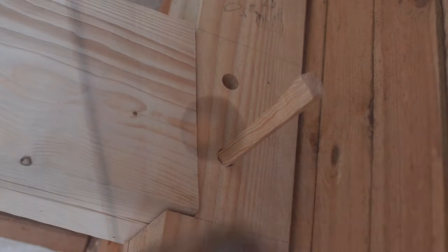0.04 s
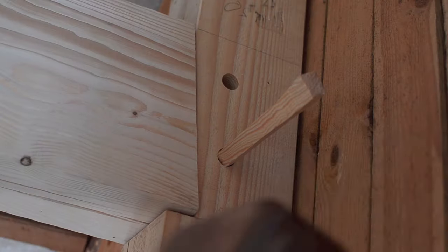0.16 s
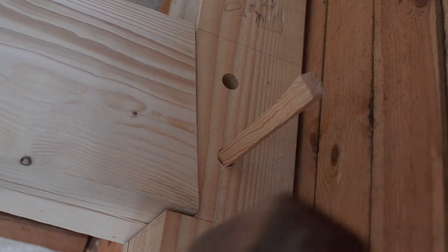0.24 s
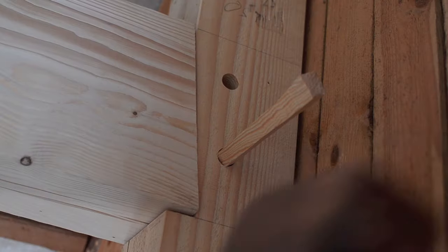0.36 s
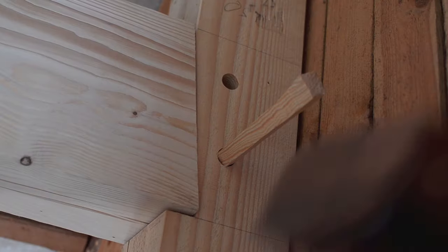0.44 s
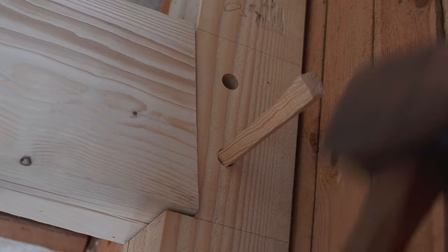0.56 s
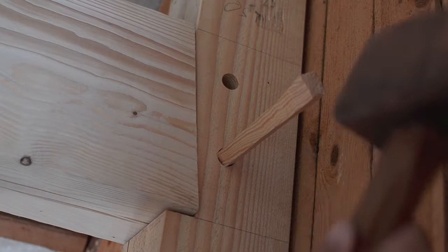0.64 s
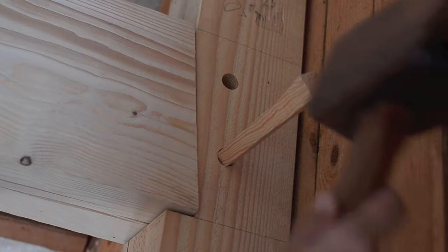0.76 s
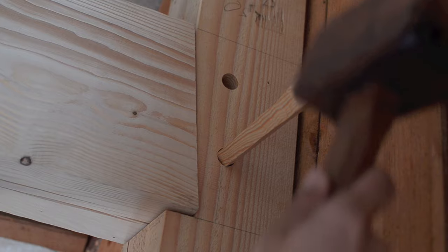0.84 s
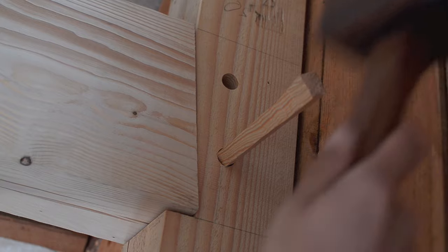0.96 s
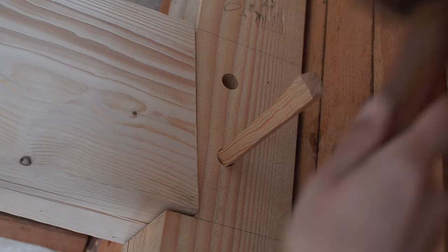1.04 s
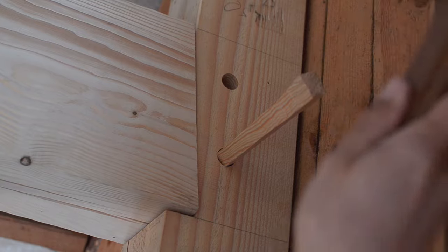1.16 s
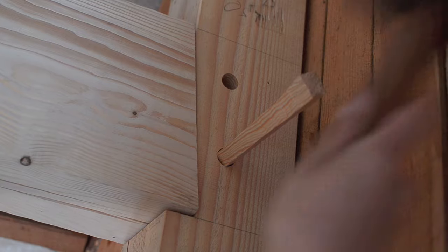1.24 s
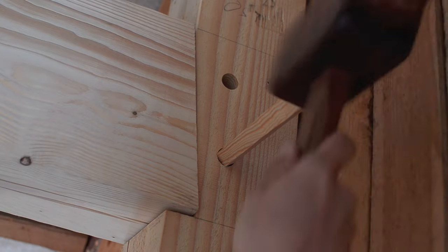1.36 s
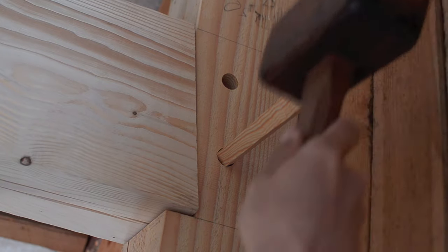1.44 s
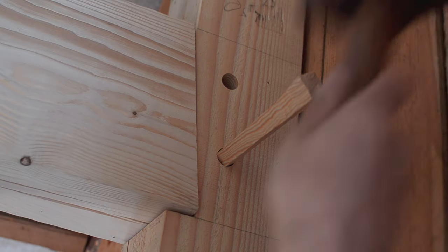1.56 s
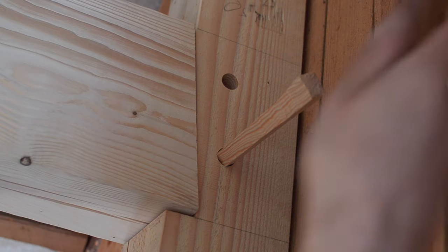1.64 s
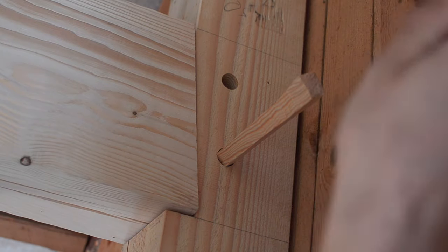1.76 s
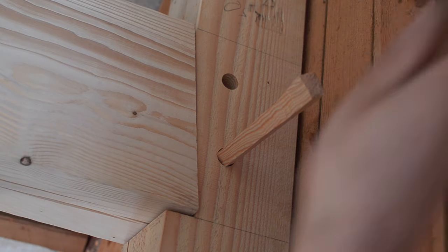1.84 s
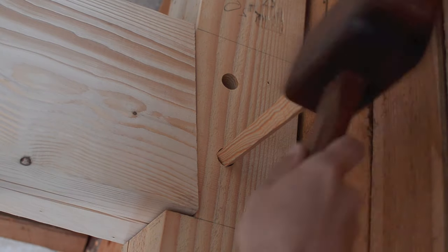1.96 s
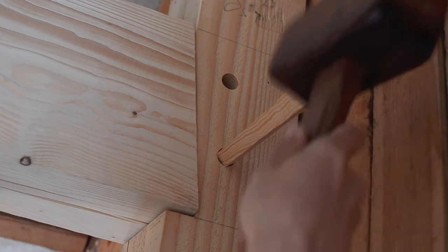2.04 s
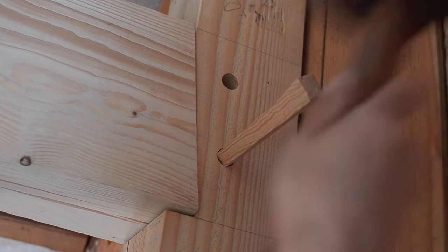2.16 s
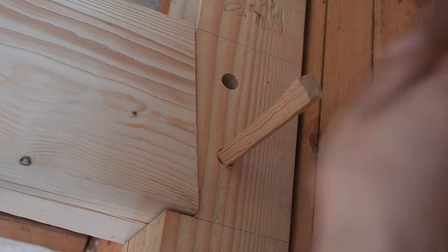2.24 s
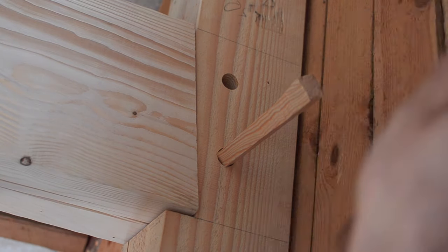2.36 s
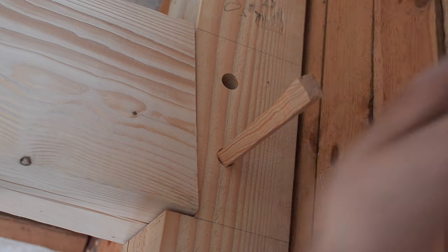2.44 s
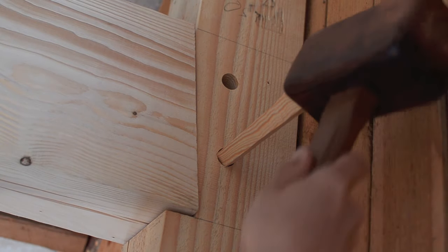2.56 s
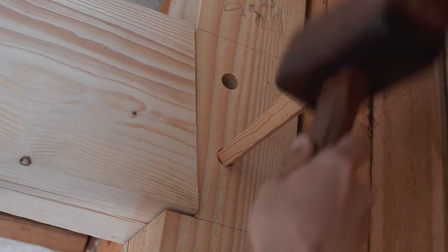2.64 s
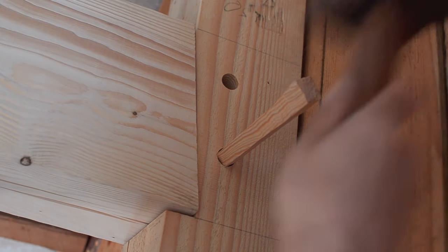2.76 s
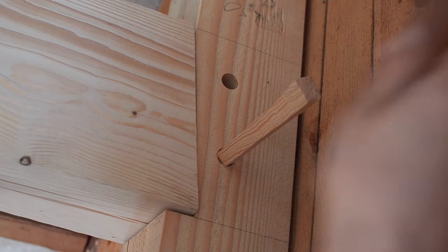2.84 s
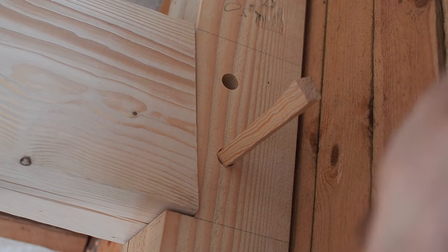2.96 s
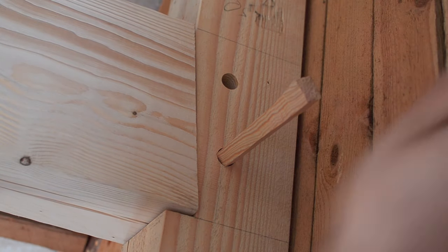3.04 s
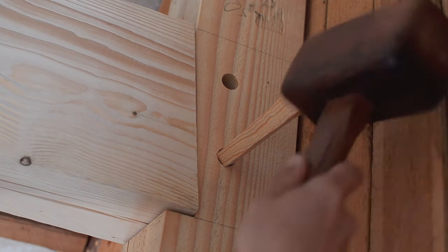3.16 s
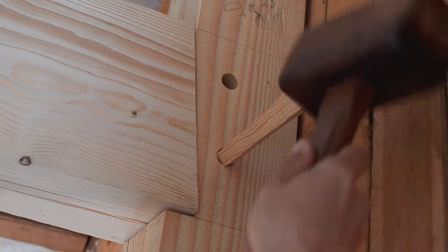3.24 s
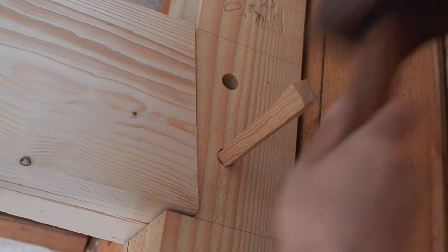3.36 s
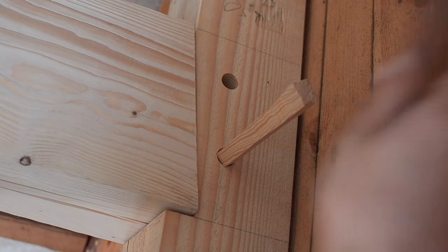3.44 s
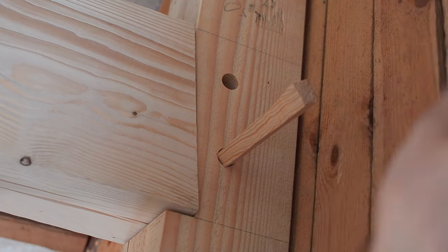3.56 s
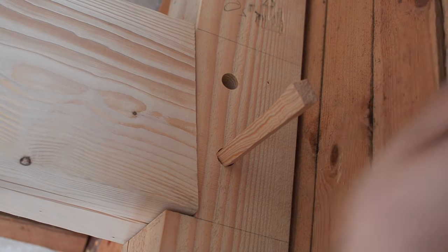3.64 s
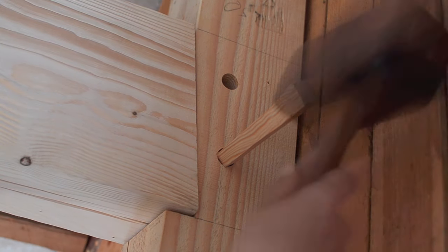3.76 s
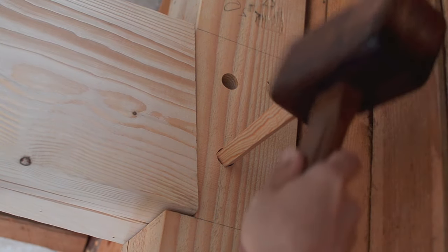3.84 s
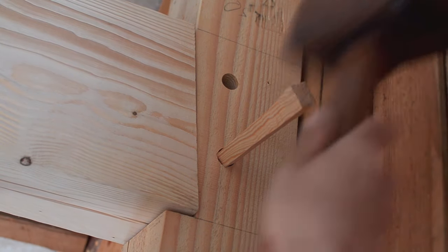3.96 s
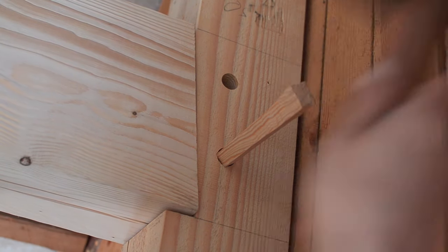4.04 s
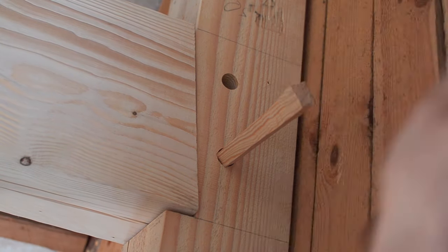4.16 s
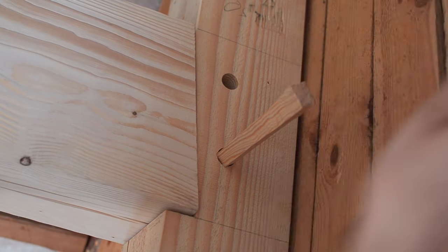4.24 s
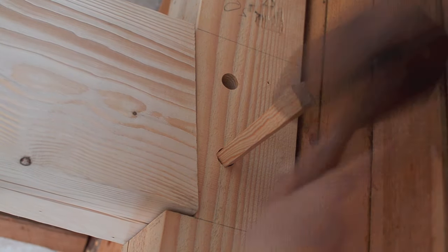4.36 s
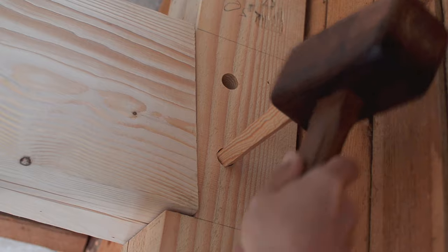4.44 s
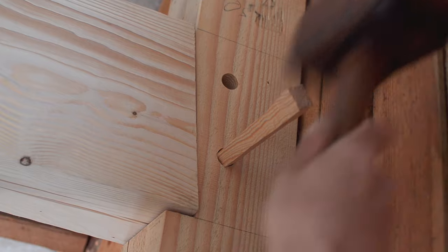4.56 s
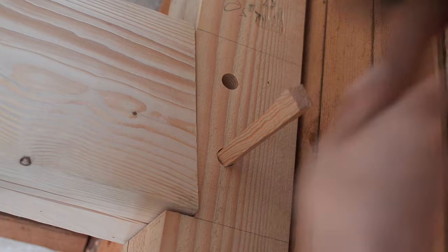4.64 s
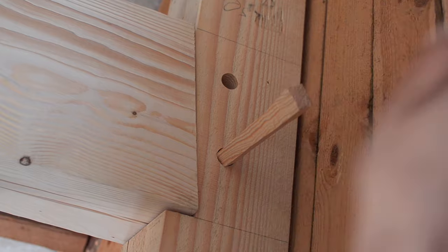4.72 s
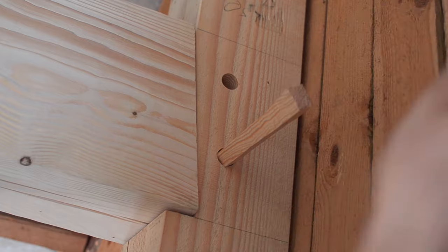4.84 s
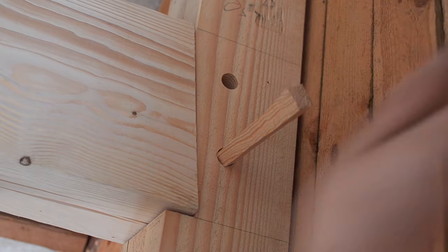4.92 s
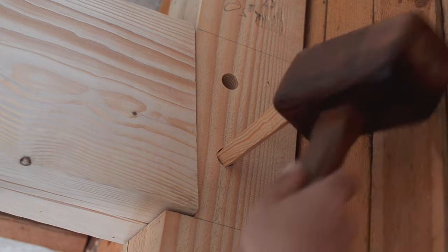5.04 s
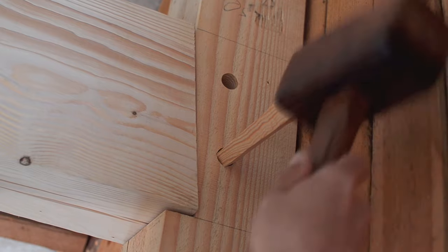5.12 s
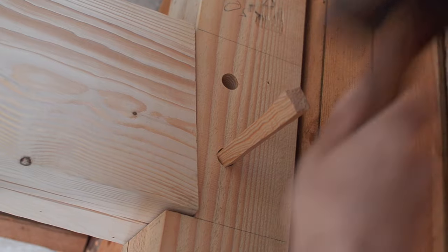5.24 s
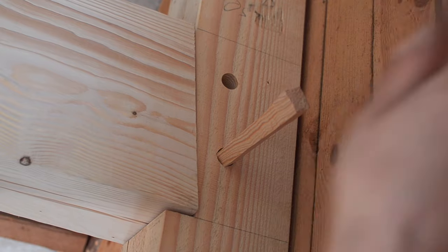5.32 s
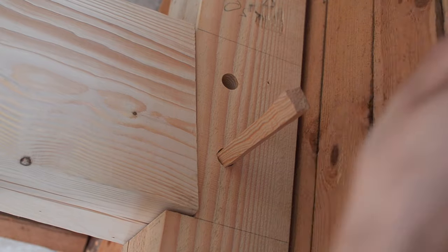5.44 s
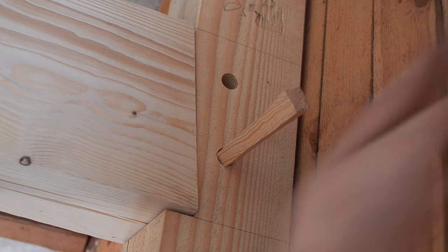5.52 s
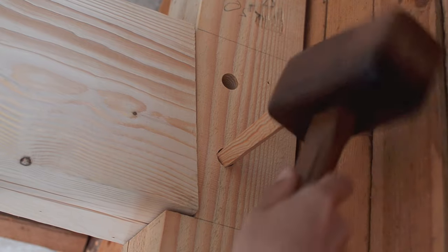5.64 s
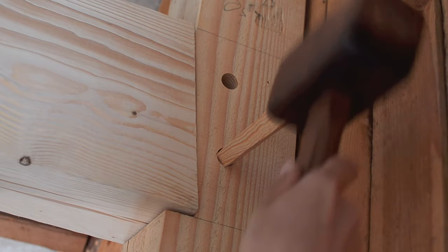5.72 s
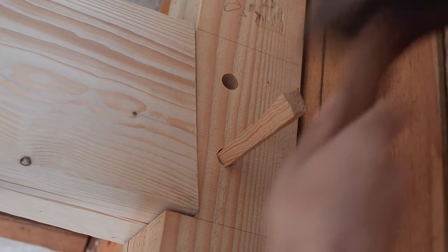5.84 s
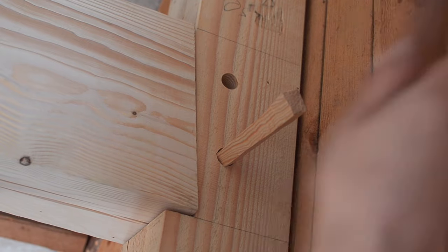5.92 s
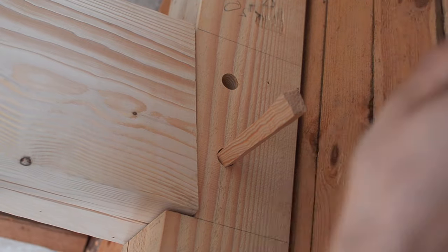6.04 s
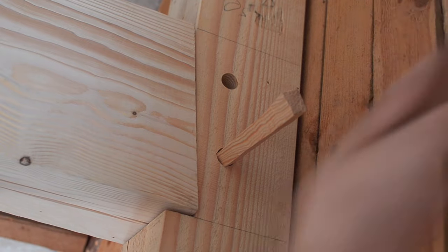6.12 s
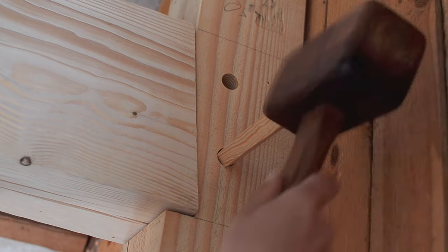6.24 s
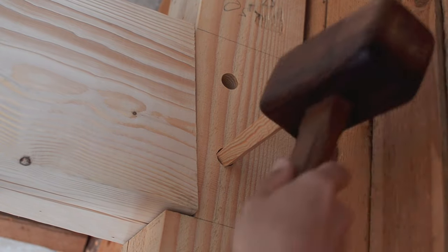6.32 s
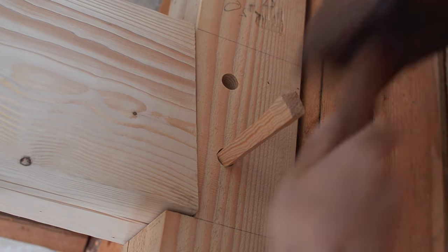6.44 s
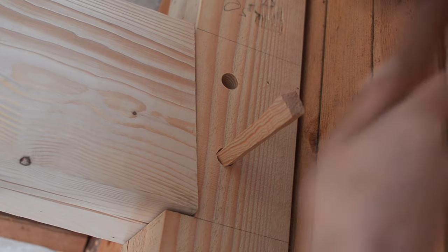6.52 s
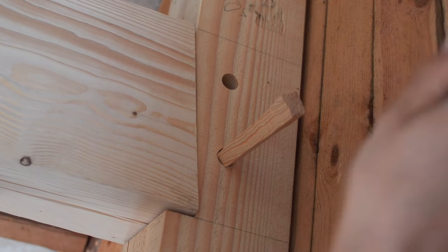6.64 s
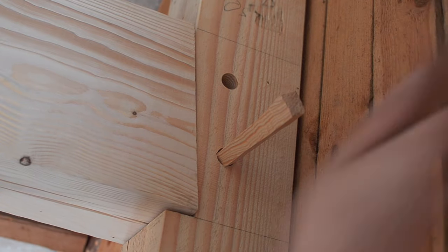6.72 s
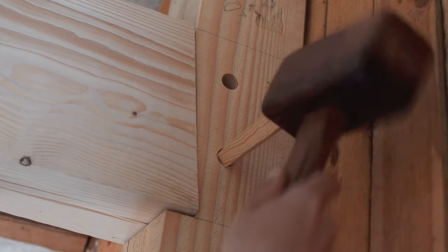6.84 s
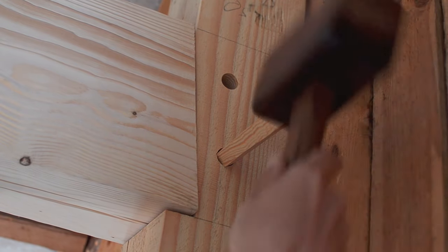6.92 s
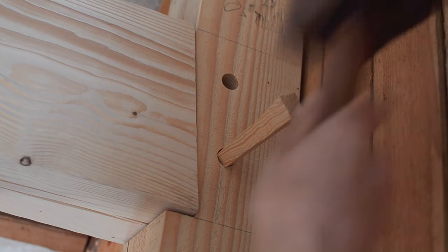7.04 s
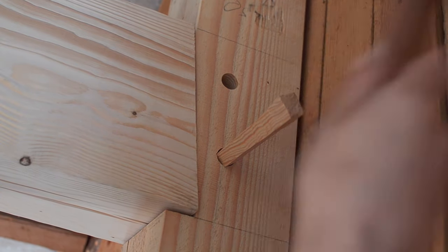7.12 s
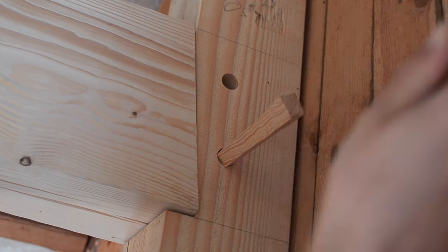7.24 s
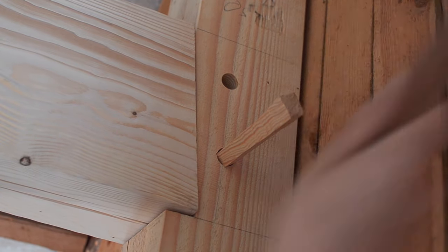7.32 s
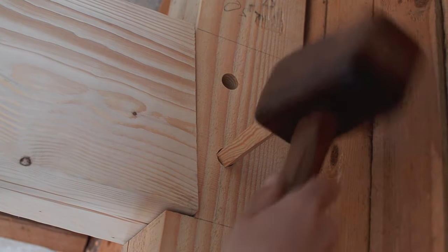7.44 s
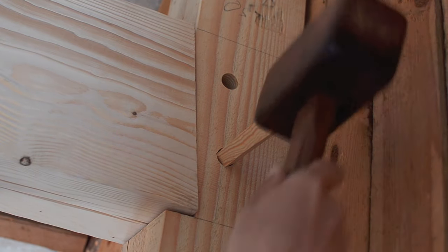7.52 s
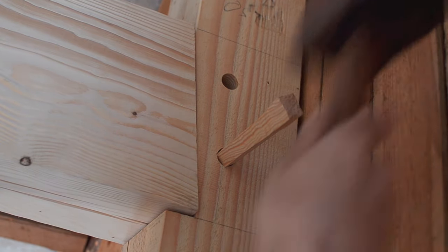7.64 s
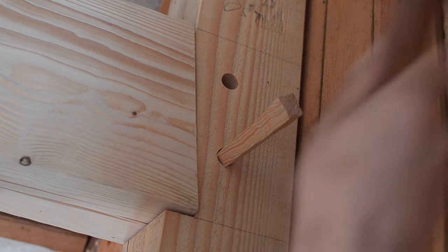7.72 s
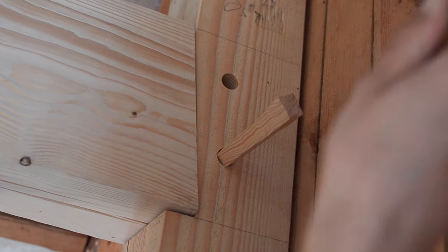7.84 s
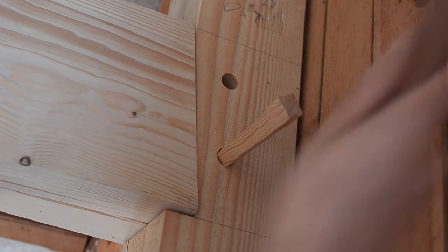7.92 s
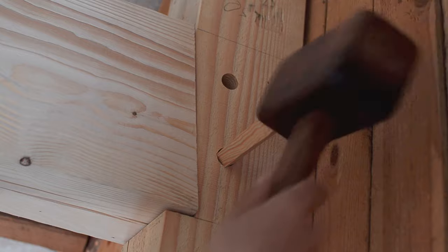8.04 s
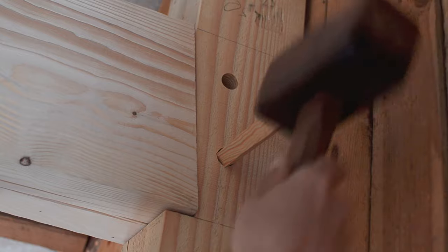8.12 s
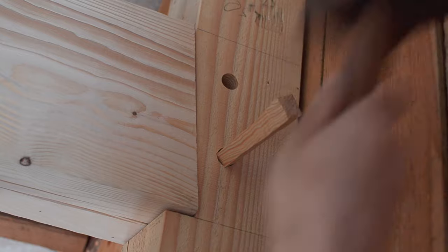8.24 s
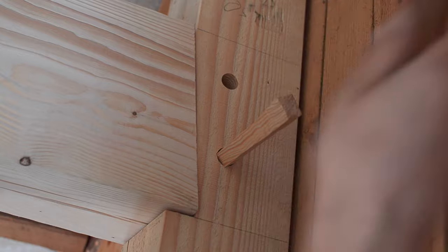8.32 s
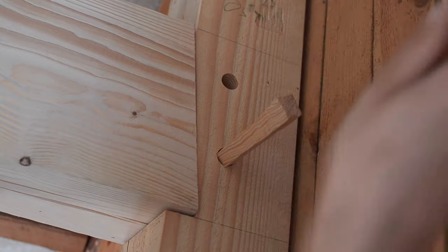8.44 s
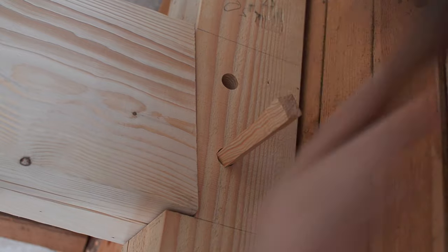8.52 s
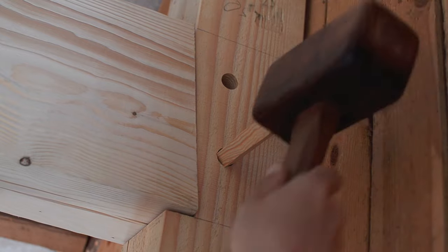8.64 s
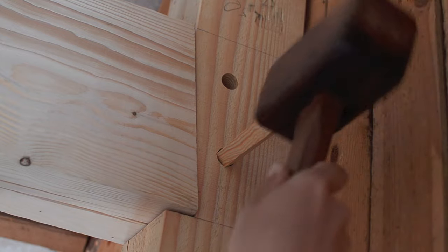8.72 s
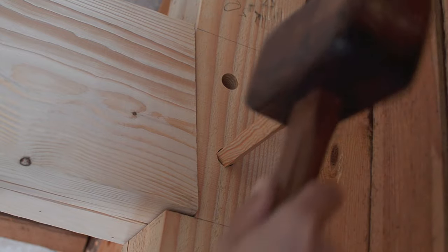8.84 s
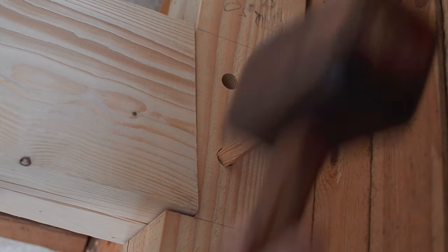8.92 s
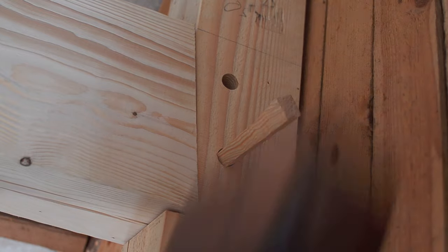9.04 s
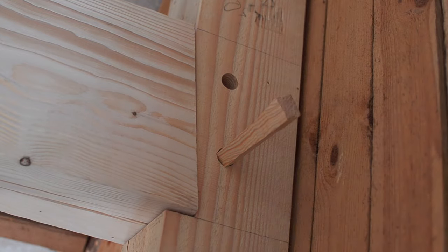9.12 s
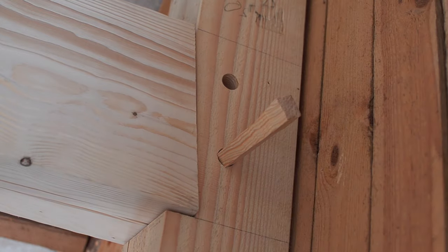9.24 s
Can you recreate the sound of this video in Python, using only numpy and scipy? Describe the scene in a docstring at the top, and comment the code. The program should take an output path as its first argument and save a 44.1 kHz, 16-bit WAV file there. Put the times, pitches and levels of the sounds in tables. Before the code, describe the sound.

After a quiet opening, evenly spaced close mallet blows crack on a wooden peg, booming through timber, their tone growing tighter and harder.

```python
"""Mallet and peg

Faint air, low rumble, soft rustles and later small high ticks, all filtered noise; a heavy mallet drives
a wooden peg into a timber frame, thirteen blows, close up. Each blow is a crack, a contact and short peg
modes, with slow waves through the building and a dense noise tail for the bare room, all coloured by its
push. The tone hardens as the peg seats, and loud peaks overload the recorder."""
import sys
import numpy as np
from scipy import signal
from scipy.fft import rfft, irfft
from scipy.io import wavfile

SR = 44100
rng = np.random.default_rng(int(sys.argv[2]) if len(sys.argv) > 2 else 0)


def unload_audio(sound):
    """Save the sound as a 16-bit wav file, at the path given as the first command line argument."""
    columns = np.transpose(np.atleast_2d(sound))
    # keep every value between -1 and 1, then stretch to whole-number steps
    steps = np.round(np.clip(columns, -1, 1) * 32767)
    wavfile.write(sys.argv[1], SR, steps.astype(np.int16))


N = 409248

# likeness of diffuse sound at the two microphones: (frequency [Hz], correlation [0-1])
LIKENESS = [(50, 0.1), (300, 0.6), (1200, .8), (3000, 0.7), (8000, 0.6)]
# tint of the still air in the house: (frequency [Hz], relative density [dB per Hz])
AIR_TINT = [(20, 9), (60, 1.5), (150, 5.5), (300, 4.5), (800, 4.5), (1600, 0), (2500, -4), (4000, -10.5),
            (7000, -18), (11000, -19), (16000, -22)]
AIR_DB = -62  # before the final balance
# faint low rumble at the start, soft rustles, later small high ticks:
# (time [s], length [s], level before fades [dB], low edge [Hz], high edge [Hz])
SMALL_NOISES = [(.005, 0.073, -53, 35, 189), (0.019, .26, -63, 25, 110), (0.093, 0.15, -64.5, 800, 3500),
                (0.196, 0.12, -62, 1000, 3700), (0.809, 0.14, -67, 300, 1800),
                (3.072, .04, -70, 3560, 6500), (4.693, 0.095, -63, 2550, 5000),
                (6.544, 0.075, -66, 2480, 5000)]
# the blows: (time [s], strength [dB], tightness of the peg [0-1], extra treble of a square hit [dB])
BLOWS = [(1.379, -2, .68, -1), (2.0111, 0, 0.11, -2.5), (2.6, -0.3, .08, -2), (3.2138, -0.9, 0.08, 2.1),
         (3.8343, -0.5, 0.14, 1), (4.4398, -0.2, 0.17, 0.5), (5.0648, -0.15, 0.15, 0.5),
         (5.6553, -0.74, .35, 4), (6.2757, 1.1, 0.3, -1.3), (6.8611, -0.67, 0.86, 0.5),
         (7.46, 0.3, 0.86, 0.1), (8.077, 0.85, 1, -3), (8.6418, 1, 0.93, -1.3)]
# spectrum of the mallet's push; a tight peg passes on more thud and clack:
# (frequency [Hz], level when loose [dB], level when tight [dB])
PUSH = [(140, -1.5, -1.5), (290, -3, 3.5), (400, -0.5, 4.5), (560, 1, -0.36), (735, -0.1, 2),
        (1130, 4.5, 3.94), (1800, -1.67, 3), (4530, -3.5, -2)]
TREBLE_HZ = 3000  # a square hit is brighter above here
# modes of peg, mallet and post before scatter:
# (frequency [Hz], level when loose [dB], level when tight [dB], t60 [s])
PEG_MODES = [(244, -22.5, -26.5, 0.05), (334.9, -16.5, -15, 0.13), (415, -20, -17.5, 0.15),
             (510.2, -19.5, -26, 0.14), (582.6, -11.5, -9.5, 0.049), (698, -17.5, -14.5, 0.056),
             (916.5, -14, -19.5, 0.069), (996, -17, -15, 0.039), (1116, -2, -4.5, 0.013),
             (1183, -9, -3, 0.0087), (1261, -16, -6, 0.022), (1582, -5, -13, 0.043),
             (1680, 0.5, -10, 0.024), (1816, 4, -8, 0.018), (2203, 3, 4.2, 0.012), (2392, -15, -4.5, 0.024),
             (2476, -13, -1.5, 0.019), (3236, -14.5, -10, 0.031), (4200, -16.5, -9, 0.027)]
CONTACT_LOOSE_HZ, CONTACT_TIGHT_HZ = 1090, 1894  # the contact stiffens as the peg binds
# echoes from the nearest boards: (delay [s], level [dB])
ECHOES = [(.0046, -14), (.0096, -15), (0.0177, -25.5), (0.0207, -25.5)]
POST_HZ, POST_DB, POST_T60 = 147.7, -26, 0.8  # the post's own boom; t60 in s
# bending waves of walls and floor: (frequency [Hz], first swell's level [dB], time from the crest at which the
# swell has fallen by about 8 dB [s])
FRAME_WAVES = [(26, -46.5, .12), (45.7, -41.5, 0.22), (67, -41, .05), (155.6, -38, 0.12),
               (222.4, -26, 0.054), (290, -21.5, 0.015), (331, -38.5, 0.16), (397, -33, 0.031),
               (533, -38, 0.2), (735, -41, .11), (833, -35, .16)]
TRIP_HZ, TRIP_S = 100, 0.2  # a wave of this pitch makes one round trip of the building in this time
TRIP_LOSS_DB = 12.5  # lost on each further trip
# the room's ring: (frequency [Hz], relative level [dB], t60 once the feeding ends [s])
ROOM_RING = [(30, -24.5, 1.6), (95, -21, 2.3), (140, -7, 1.4), (303, -4, 0.94), (483, -2.5, 0.87),
             (830, -2.5, 0.71), (1400, -9, 0.54), (1730, -10.5, 0.48), (2370, -16, 0.43),
             (2900, -18.5, 0.38), (4680, -26, .39), (8450, -43, 0.22), (12000, -54, 0.3), (17000, -65, .2)]
EDGE_HZ = 16400  # top of the recorder's band


def amp(db):
    """Decibels to gain."""
    return 10 ** (np.asarray(db) / 20)


def read(freqs, values, hz):
    """A curve drawn on a log-frequency axis."""
    return np.interp(np.log(hz + 1), np.log(np.asarray(freqs) + 1), values)


def add(mix, s, sound):
    """Mixes a sound into a stereo bed at time s."""
    part = mix[:, max(round(s * SR), 0):][:, :sound.shape[-1]]
    part += sound[..., :part.shape[1]]


def band(x, lo_hz, hi_hz):
    """A gentle band-pass."""
    edges = [lo_hz, min(hi_hz, SR / 2 - 1)]
    return signal.sosfilt(signal.butter(2, edges, "band", fs=SR, output="sos"), x)


def causal(freqs, db, size=2048):
    """The shortest causal pulse with this spectrum, by minimum phase."""
    log_gain = np.log(amp(read(freqs, db, abs(np.fft.fftfreq(size, 1 / SR)))))
    spectrum = np.exp(np.conj(signal.hilbert(log_gain)))
    return np.fft.ifft(spectrum).real[:size // 2]


def diffuse(size):
    """White noise from all sides, partly alike at two close microphones."""
    a, b = rfft(rng.standard_normal((2, size)))
    same = np.clip(read(*np.transpose(LIKENESS), np.fft.rfftfreq(size, 1 / SR)), 0, 1)
    mid = a * np.sqrt((1 + same) / 2)
    side = b * np.sqrt((1 - same) / 2)
    return irfft(np.array([mid + side, mid - side]), size)


def air():
    """The steady hush of the house: diffuse noise, tinted."""
    tint = amp(read(*np.transpose(AIR_TINT), np.fft.rfftfreq(N, 1 / SR)))
    hush = irfft(rfft(diffuse(N)) * tint, N)
    return amp(AIR_DB) * hush / hush.std()


def small_noises():
    """Low rumble at the start, soft rustles and later high ticks: swells of band-limited noise."""
    mix = np.zeros((2, N))
    for s, length_s, db, lo_hz, hi_hz in SMALL_NOISES:
        noise = band(diffuse(SR), lo_hz, hi_hz)[:, :int(length_s * SR)]
        swell = np.hanning(noise.shape[1])
        add(mix, s, amp(db) * noise / noise.std() * swell)
    return mix


def push(strength_db, tight, treble_db):
    """The force of one blow, coloured by how firmly the peg resists and how squarely it is hit."""
    hz, loose_db, tight_db = np.transpose(PUSH)
    treble = hz ** 2 / (hz ** 2 + TREBLE_HZ ** 2)
    colour_db = loose_db + tight * (tight_db - loose_db)
    return causal(hz, strength_db + colour_db + treble_db * treble)


def peg(tight, contact_hz, contact_db=10, contact_t60=0.006, scatter_db=1, detune=0.0031,
        crack_db=-3, crack_t60=0.02, radiate_hz=170):
    """Wood on wood: stiff contact, crack of crushed fibres, short modes that rebalance as the peg seats."""
    t = np.arange(SR // 6) / SR
    hz, loose_db, tight_db, t60 = np.transpose(PEG_MODES)[:, :, None]
    spot, stretch = rng.standard_normal((2, len(PEG_MODES), 1))  # no two blows land on the same spot
    level_db = loose_db + tight * (tight_db - loose_db) + scatter_db * spot
    mode_hz = hz * (1 + detune * stretch)
    ring = (amp(level_db - 60 * t / t60) * np.sin(2 * np.pi * mode_hz * t)).sum(0)
    contact = amp(contact_db - 60 * t / contact_t60) * np.sin(2 * np.pi * contact_hz * t)
    fibres = band(rng.standard_normal(len(t)), lo_hz=1500, hi_hz=3800)
    onset = 1 - np.exp(-t / 0.0007)
    crack = fibres / fibres.std() * amp(crack_db - 60 * t / crack_t60) * onset
    return -band(ring + contact + crack, radiate_hz, 15000)  # so small a source radiates little bass


def nearby(x, echo_hz=3000, echo_lag_s=0.00008):
    """The straight path reaches the left microphone first; duller board echoes come from further aside."""
    size = 2 * len(x)
    hz = np.fft.rfftfreq(size, 1 / SR)
    # a small random spread, blow to blow, in the lag between the two microphones
    lag_s = rng.uniform(0.00002, 0.000042)
    echoes = sum(amp(db) * np.exp(-2j * np.pi * hz * s) for s, db in ECHOES)
    echoes = echoes / (1 + 1j * hz / echo_hz)
    left = 1 + echoes
    right = np.exp(-2j * np.pi * hz * lag_s) + echoes * np.exp(-2j * np.pi * hz * echo_lag_s)
    return irfft(rfft(x, size) * np.array([left, right]), size)[:, :len(x)]


def frame(count=3):
    """The post booms first; bending waves cross the building and return, the deepest slowest."""
    t = np.arange(SR) / SR
    waves = amp(POST_DB - 60 * t / POST_T60) * np.sin(2 * np.pi * POST_HZ * t)
    for hz, db, width_s in FRAME_WAVES:
        trip_s = TRIP_S * np.sqrt(TRIP_HZ / hz)
        for k in range(count):
            away = (t - (k + 1) * trip_s) / width_s
            swell = amp(db - k * TRIP_LOSS_DB) / np.cosh(1.55 * away)
            waves = waves + swell * np.sin(2 * np.pi * (hz * t + rng.random()))
    return waves * (1 - np.exp(-t / 0.017))


def room(hold_s=0.12, build_s=0.006):
    """Dense reflections; shaking boards feed them at first, then each band dies at its own speed."""
    size = 3 * SR // 2
    hz, t, z = signal.stft(diffuse(size), SR, nperseg=1024, noverlap=768)
    freqs, db, t60 = np.transpose(ROOM_RING)
    age = np.hypot(t, hold_s) - hold_s  # starts slowly, then runs with the clock
    z = z * amp(read(freqs, db, hz)[:, None] - 60 * age / read(freqs, t60, hz)[:, None])
    tail = signal.istft(z, SR, nperseg=1024, noverlap=768)[1][:, :size]
    return tail * (1 - np.exp(-(np.arange(size) / SR / build_s) ** 2))


def hammering(peg_db=1, frame_db=0.9, room_db=0, ring_in_room_db=-42, fresh=0.45, shake_db=0.5):
    """Each push drives peg, frame and room; the reflections drift as the peg and the arm move."""
    mix, waves, first, last = np.zeros((2, N)), frame(), room(), room()
    for s, strength_db, tight, treble_db in BLOWS:
        contact_hz = CONTACT_LOOSE_HZ + tight * (CONTACT_TIGHT_HZ - CONTACT_LOOSE_HZ)
        knock = peg(tight, contact_hz)
        drift = s * SR / N
        shared = np.sqrt(1 - drift) * first + np.sqrt(drift) * last
        tail = np.sqrt(1 - fresh) * shared + np.sqrt(fresh) * room()  # fresh: share new to this blow
        sound = amp(room_db) * tail
        add(sound, 0, amp(ring_in_room_db) * signal.fftconvolve(tail, knock[None], axes=1))
        add(sound, 0, amp(peg_db) * nearby(knock))
        add(sound, 0, amp(frame_db + shake_db * tight) * waves)  # a tight peg shakes the building more
        force = push(strength_db, tight, treble_db)
        add(mix, s, signal.fftconvolve(sound, force[None], axes=1))
    return mix


def scene(left_db=-1.0, right_db=-0.46):
    """Still air, small noises and blows, with a little more gain on the right."""
    return (air() + small_noises() + hammering()) * amp([[left_db], [right_db]])


def record(dry, couple_hz=90):
    """The overloaded input flattens peaks, adding harshness but little bass; then the band limit."""
    fine = signal.resample_poly(dry, 2, 1, axis=1)  # clip at double rate
    flat = signal.resample_poly(np.clip(fine, -0.98, 0.98), 1, 2, axis=1)
    high_pass = signal.butter(1, couple_hz, "high", fs=SR, output="sos")
    harsh = signal.sosfilt(high_pass, flat - dry)
    band_limit = signal.firwin(255, EDGE_HZ, window=("kaiser", 8), fs=SR)
    return signal.oaconvolve(dry + harsh, band_limit[None], "same")


dry = scene()
out = record(dry)
unload_audio(out)
```